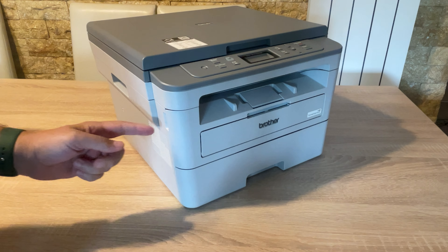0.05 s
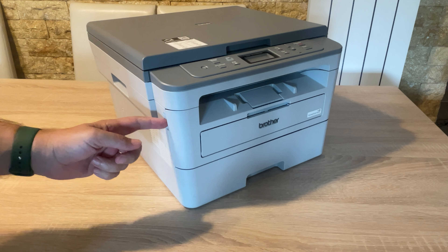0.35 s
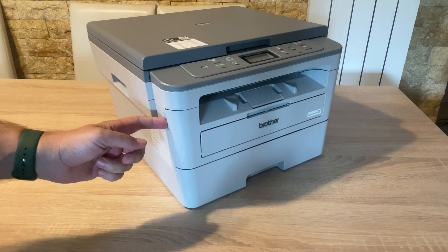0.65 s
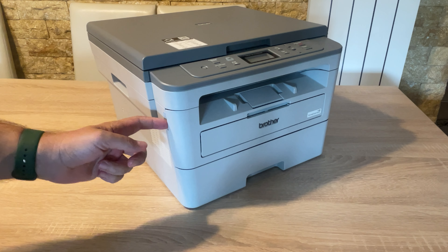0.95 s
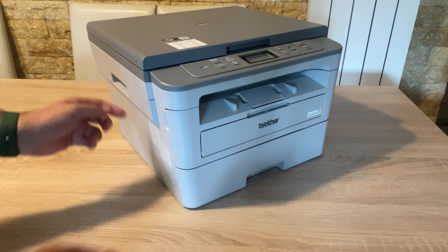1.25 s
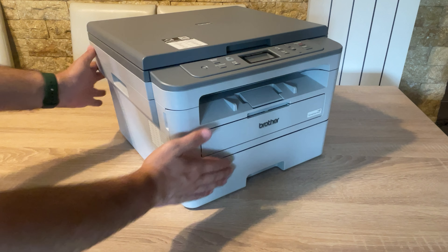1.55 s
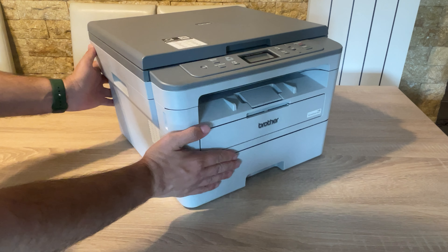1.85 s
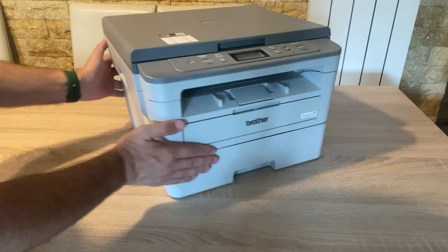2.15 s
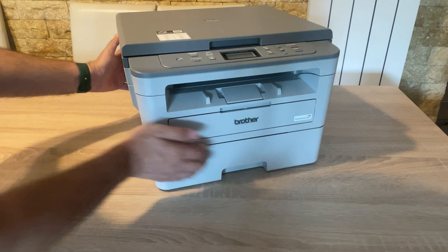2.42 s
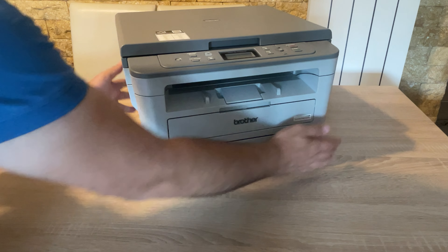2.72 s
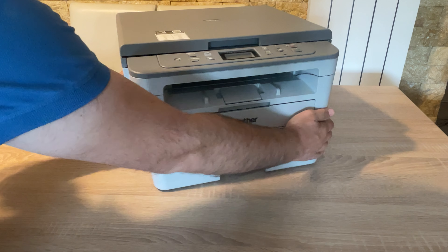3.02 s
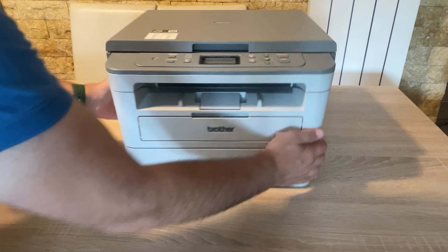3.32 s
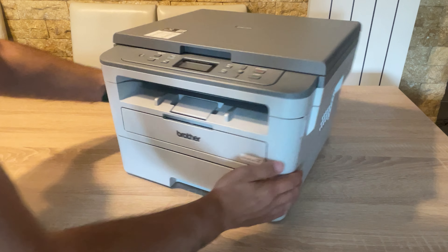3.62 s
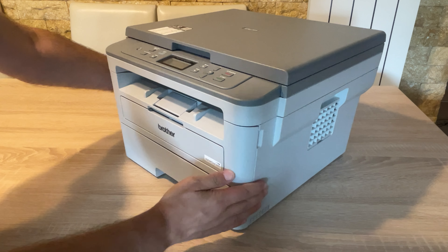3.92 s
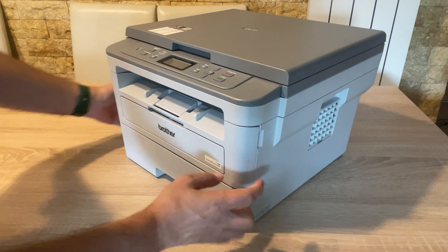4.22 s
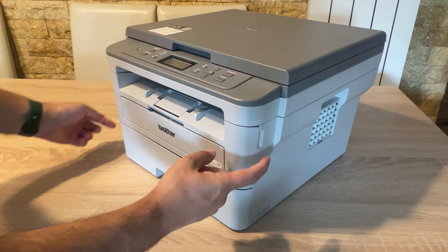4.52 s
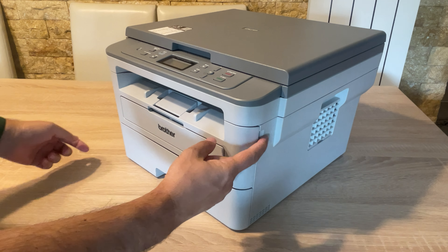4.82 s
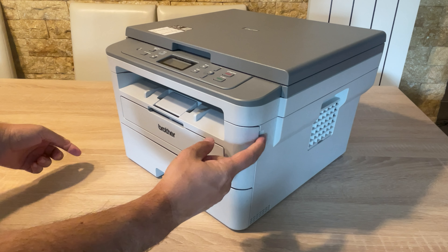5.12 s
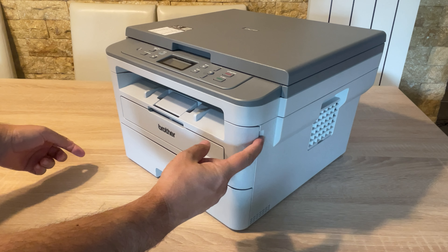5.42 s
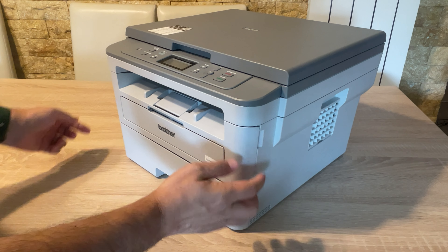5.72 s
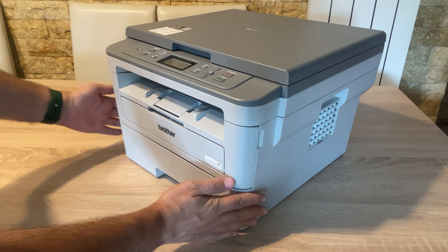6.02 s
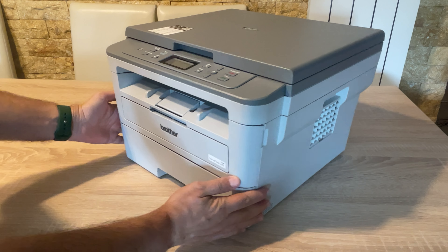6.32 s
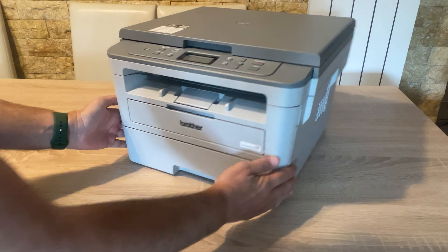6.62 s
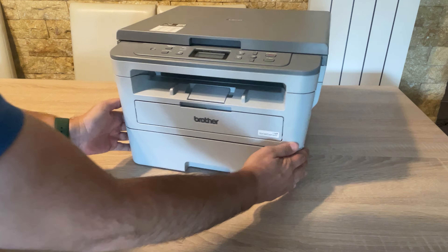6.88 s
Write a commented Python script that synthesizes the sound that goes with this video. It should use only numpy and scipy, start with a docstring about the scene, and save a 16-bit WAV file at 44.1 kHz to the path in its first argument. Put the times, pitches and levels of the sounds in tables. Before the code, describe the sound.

A plastic printer is tapped, then pushed and turned on a wooden table, scraping and shuddering between hollow knocks.

```python
"""Pushing a printer across a table

In a small, quiet room a plastic printer is tapped, then pushed and turned on a wooden table.
Its feet catch and slip on the grain, so they hiss, scrape and shake the tabletop. Hands rub
and knock on the hollow case, its loose panels clack and its seams snap. Two microphone
openings hear it from close by, with a short echo from the walls."""
import sys
import numpy as np
from scipy import signal
from scipy.fft import rfft, irfft, next_fast_len
from scipy.io import wavfile

SR = 44100
rng = np.random.default_rng(int(sys.argv[2]) if len(sys.argv) > 2 else 0)


def persist_wave(psi):
    """Save psi, clipped to +-1, as 16-bit WAV."""
    counts = np.round(np.clip(psi, -1, 1) * 32767).astype(np.int16)
    wavfile.write(sys.argv[1], SR, np.atleast_2d(counts).T)


N = 306495

# Tone curves of the plastic panels, the shaking tabletop and a scraped case: pitch_hz, level_db
PANEL_TONE = [(30, -58), (100, -13), (400, 5), (800, 5.5), (1600, 4), (2200, -3), (3500, -10.5),
              (7000, -13), (9000, -9.5), (9800, -13), (10600, -29), (12400, -37), (14000, -51)]
TABLETOP_TONE = [(25, -43), (55, -5.5), (85, -1), (108, -2.5), (128, 3.5), (145, 3.5), (165, -1.5),
                 (205, -1), (270, -3.5), (450, -49), (13000, -77)]
SCRAPE_TONE = [(30, -60), (120, -27.5), (210, 2.5), (290, 4), (360, 2), (480, -1), (620, -1.5), (830, -5),
               (1080, -3), (1300, -5), (1580, -4), (2100, -10), (2800, -16), (5000, -41), (13000, -77)]
# Tone curves of two walls of the shell under a soft fingertip: pitch_hz, level_db
SIDE_WALL = [(30, -35), (200, 5), (430, 9), (590, 15.5), (780, 16), (950, -2), (1420, 10), (1700, -4),
             (2600, -10), (2950, -5), (3300, -13), (4600, -10), (5600, -23), (9300, -22), (10500, -56)]
FRONT_PANEL = [(30, -35), (150, -12), (420, 5.5), (600, -4), (850, 4), (1150, -2.5), (1330, 3.5), (1750, 4),
               (2100, -7), (2450, -4), (2680, 1.5), (2950, -4.5), (4200, -5), (5200, -12.5), (7800, -18),
               (9300, -14.5), (10500, -65)]


def amp(db):
    """Turns decibels into a number to multiply by."""
    return 10 ** (np.asarray(db) / 20)


def unit(x):
    """Scales a signal to an average (rms) size of 1."""
    return x / np.sqrt(np.mean(x ** 2) + 1e-20)


def curve_at(curve, hz):
    """Looks up a curve at any pitch, gliding between its rows."""
    pitches, values = np.transpose(curve)
    return np.interp(np.log(hz + 1), np.log(pitches + 1), values)


def colour(x, curve):
    """Shapes a sound with a tone curve (pitch_hz, level_db), with no ringing ahead of the sound."""
    log_gain = np.log(amp(curve_at(curve, abs(np.fft.fftfreq(8192, 1 / SR)))))
    response = np.fft.ifft(np.exp(np.conj(signal.hilbert(log_gain)))).real[:4096]
    return signal.oaconvolve(x, response[None], axes=1)[:, :x.shape[1]]


def band_db(x, low_hz, high_hz):
    """Level between two pitches, with left and right averaged."""
    hz = np.fft.rfftfreq(x.shape[1], 1 / SR)
    power = abs(rfft(x.mean(0))[(hz >= low_hz) & (hz < high_hz)]) ** 2
    return 10 * np.log10(2 * power.sum() / x.shape[1] ** 2 + 1e-20)


def levelled(x, low_hz, high_hz):
    """Scales a sound so that its level between two pitches is 0 dB."""
    return x * amp(-band_db(x, low_hz, high_hz))


def wander(per_s):
    """A random curve that heads for a new value per_s times a second."""
    targets = rng.standard_normal(4000)
    return unit(np.interp(np.arange(N) / SR * per_s, np.arange(len(targets)), targets))


def add(mix, start_s, sound):
    """Adds a sound into the mix at the given time."""
    part = mix[:, max(round(start_s * SR), 0):][:, :sound.shape[1]]
    part += sound[:, :part.shape[1]]


def stereo(x):
    """Blends two signals into the partly alike pair that the microphone openings hear."""
    # How alike the two sides are: pitch_hz, likeness (0 to 1)
    likeness = [(130, 0.93), (270, 0.88), (580, 0.13), (1250, 0.52), (2700, 0.074), (6000, 0.2), (7600, 1),
                (12000, 0.62)]
    # How far the left wave runs ahead: pitch_hz, lead_radians
    left_lead = [(1000, 0), (2600, -1.3), (4800, 0), (6600, -.3), (7200, -2.5), (8000, -1.2), (8700, 0),
                 (9400, 1.3), (10200, 3), (10600, -2.8), (11400, 0)]
    # How much louder the left side is: pitch_hz, level_db
    balance = [(60, -0.2), (350, 2.5), (630, -1), (2000, 0.5), (3700, -2), (6500, -6), (8500, -1),
               (12000, 0.5)]
    size = next_fast_len(x.shape[1] + 512)
    hz = np.fft.rfftfreq(size, 1 / SR)
    left, other = rfft(x, size)
    same = np.clip(curve_at(likeness, hz), 0, .995)
    lean = amp(curve_at(balance, hz) / 2)
    right = (same * left + np.sqrt(1 - same ** 2) * other) * np.exp(-1j * curve_at(left_lead, hz))
    return irfft(np.array([left * lean, right / lean]), size)[:, :x.shape[1]]


def room(x, wet_db, gap_s=.008):
    """Adds echoes from the walls at level wet_db, each pitch dying away at its own speed."""
    # Time the echoes take to fall by 60 dB: pitch_hz, fade_s
    fade_times = [(150, 0.4), (400, 0.63), (1000, 0.36), (2800, 0.39), (8000, 0.25)]
    echoes = rng.standard_normal((2, SR // 2)) * (np.arange(SR // 2) > gap_s * SR)
    hz, t, bands = signal.stft(echoes, SR, nperseg=256)
    fade = amp(-60 * t / curve_at(fade_times, hz)[:, None])
    tail = signal.istft(bands * fade, SR, nperseg=256)[1]
    tail /= np.linalg.norm(tail[0])
    return x + amp(wet_db) * signal.fftconvolve(x, tail, axes=1)[:, :x.shape[1]]


def room_tone(level_db=-60.5):
    """The dull, steady background of the room, with two faint hums."""
    # Tone curve of the background: pitch_hz, level_db
    air_tone = [(18, -44), (35, -5.5), (55, -3), (130, 0), (185, -3), (370, -1.5), (480, -8), (1050, -10.5),
                (1560, -16), (2000, -24), (3000, -35.5), (8800, -38), (10200, -43.5), (12500, -48),
                (13500, -80)]
    # Narrow bands of noise that hum: pitch_hz, width_hz, level_db
    hums = [(376.2, 6.9, -71.5), (663.7, 8.9, -74)]
    out = amp(level_db) * unit(stereo(colour(rng.standard_normal((2, N)), air_tone)))
    for hz, width_hz, db in hums:
        hum = signal.lfilter(*signal.iirpeak(hz, hz / width_hz, SR), rng.standard_normal(N))
        out += amp(db) * unit(hum)
    return out


def rubs():
    """Skin catches and slides on the case: a light touch hisses, a firm palm scuffs through the shell."""
    # Tone curve of skin rubbing on plastic, with the microphone's dip near 10.4 kHz: pitch_hz, level_db
    rub_tone = [(500, -25), (2500, 4.5), (6000, -5), (7500, -3.5), (8700, 1.5), (9700, 1), (10400, -34),
                (12000, -12), (13200, -49)]
    # Light touches and dragging palms: start_s, length_s, level_db
    touches = [(1.6, 0.19, -65), (2.4, 0.42, -71), (2.7, 0.21, -66.5), (5.91, 0.1, -73),
               (6.01, 0.063, -69.5)]
    scuffs = [(1.74, 0.2, -55.5), (2.34, 0.18, -52), (2.93, 0.18, -46.5), (6.0, 0.26, -47.5)]
    out = np.zeros((2, N))
    for strokes, tone, grit_db in [(touches, rub_tone, 1.5), (scuffs, SCRAPE_TONE, 3.5)]:
        grit = amp(grit_db * wander(per_s=170))
        for start_s, length_s, db in strokes:
            count = round(length_s * SR)
            friction = rng.standard_normal((2, count)) * grit[round(start_s * SR):][:count]
            add(out, start_s, amp(db) * unit(stereo(colour(friction, tone))) * np.hanning(count))
    return out


def case_ring(scatter_db=0.):
    """The case rings at its own notes after a blow; the spot that is struck favours some of them."""
    # Notes of the case on the table: pitch_hz, level_db, fade_s (time to fall by 60 dB)
    notes = [(142, 11.5, 0.83), (195.8, 11.5, 0.2), (249.8, 19, 0.23), (288, 10, 0.19), (409.7, 8.5, 0.12),
             (504, 8.5, 0.092), (630, 2.5, 0.047), (798, 7.5, 0.054), (996, 3.5, 0.064), (1338, 7.5, 0.056),
             (1530, 6.5, 0.049), (1614, 5.5, 0.029), (1790, 4, 0.023), (1950, -0.5, 0.12), (2236, -4, 0.13),
             (2700, -2, 0.031), (3060, -3.5, 0.065), (3520, -7, 0.18)]
    t, ring = np.arange(SR // 2) / SR, 0
    for hz, db, fade_s in notes:
        height = amp(db + scatter_db * rng.uniform(-1.0, 1)) * 2 * np.log(1000) / (fade_s * SR)
        ring = ring + height * amp(-60 * t / fade_s) * np.cos(2 * np.pi * (hz * t + rng.random()))
    return ring * (1 - np.exp(-t / 0.0015))


def blow(build_s, tone, ring_db, scatter_db, wet_db):
    """One blow: loose panels chatter for a moment while the case rings on."""
    age = np.arange(SR // 2) / SR / build_s
    chatter = unit(rng.standard_normal((2, len(age))) * age * np.exp(-age)) / np.sqrt(len(age))
    ring = np.array([case_ring(scatter_db), case_ring(scatter_db)])
    return stereo(room(colour(chatter, tone) + amp(ring_db) * ring, wet_db))


def hardness(hit, thud_db, clack_db, crack_db):
    """Sets a blow's lows, middle and highs: flesh mostly thuds, plastic on plastic mostly cracks."""
    onset = hit[:, :round(.03 * SR)]
    low = thud_db - band_db(onset, 100, 500)
    middle = clack_db - band_db(onset, 500, 2500)
    high = crack_db - band_db(onset, 3000, 10000)
    return colour(hit, [(380, low), (620, middle), (2400, middle), (4000, high)])


def land(mix, hit_s, hit, brush_db, lead_s=0.013):
    """Adds a blow to the mix; skin or nail brushes the plastic ever harder just before it lands."""
    count = round(lead_s * SR)
    ramp = np.linspace(0, 1, count)
    brush = stereo(colour(rng.standard_normal((2, count)), PANEL_TONE)) * ramp * (1 - ramp ** 20)
    brush = unit(brush) * hit[:, :count].std() * amp(brush_db)
    add(mix, hit_s - count / SR, np.hstack([brush, hit]))


def taps(build_s=0.0047):
    """A soft fingertip taps a wall of the shell, never quite on the same spot."""
    # Finger taps: start_s, level_db, thud_db, crack_db (both added to level_db), wall
    finger_taps = [(0.307, -38.5, -21, -31, SIDE_WALL), (0.608, -46, -16, -28, FRONT_PANEL),
                   (0.667, -47, -7.5, -44, SIDE_WALL), (1.013, -57, -12, -36, FRONT_PANEL),
                   (1.059, -59, -15, -27.5, FRONT_PANEL), (5.116, -55.5, -1.5, -45, FRONT_PANEL),
                   (5.165, -33.5, -14, -31, FRONT_PANEL), (5.3454, -30.5, -14.5, -28.5, FRONT_PANEL),
                   (5.616, -30.5, -15.5, -32, FRONT_PANEL)]
    out = np.zeros((2, N))
    for start_s, db, thud_db, crack_db, wall in finger_taps:
        hit = blow(build_s, wall, ring_db=0, scatter_db=5, wet_db=-8.5)
        land(out, start_s, hardness(hit, db + thud_db, db - 14, db + crack_db), brush_db=-19.5)
    return out


def booms(waver=0.031):
    """A hand drags on the hollow case and makes one of its low notes swell for a moment."""
    # Swelling notes: start_s, length_s, pitch_hz, level_db
    swells = [(1.567, 0.057, 285, -51), (1.762, 0.059, 281.6, -52), (2.477, 0.092, 269, -55),
              (3.002, 0.063, 217, -49.5), (4.021, 0.069, 262.3, -40), (6.119, 0.14, 253.9, -41.5),
              (6.481, 0.079, 253.5, -47.5)]
    out = np.zeros((2, N))
    bend = 1 + waver * wander(per_s=120)
    for start_s, length_s, hz, db in swells:
        count = round(length_s * SR)
        pitch_hz = hz * bend[round(start_s * SR):][:count]
        tone = unit(np.sin(2 * np.pi * np.cumsum(pitch_hz) / SR))
        add(out, start_s, amp(db) * np.hanning(count) * tone[None])
    return out


def snaps(build_s=0.00094):
    """At a seam, plastic edges jump past each other with a very short, bright tick."""
    # Ticks: start_s, peak_db
    ticks = [(1.55, -41), (3.151, -30), (3.91, -38), (4.026, -38), (6.177, -37), (6.226, -33), (6.621, -28)]
    # Tone curve of the seam: pitch_hz, level_db
    seam_tone = [(2500, -51), (6000, -21), (7200, 6), (9700, 3), (10500, -1), (13000, -13), (15500, -37),
                 (16500, -42)]
    age, out = np.arange(SR // 5) / SR / build_s, np.zeros((2, N))
    for start_s, db in ticks:
        burst = rng.standard_normal((2, len(age))) * age * np.exp(-age)
        tick = stereo(room(colour(burst, seam_tone), wet_db=-12))
        add(out, start_s, amp(db) * tick / abs(tick).max())
    return out


def knocks(sharpness=3.9):
    """Loose panels clack and hands press on the case; each struck panel adds its own hollow note."""
    # Clacking panels and gripping hands: start_s, level_db, thud_db, crack_db (both shift
    # the level, for the lows and the highs), build_s, panel_hz, panel_boost_db
    clacks = [(1.549, -29.5, -20.5, -14, 0.0082, 795, 3.4), (1.771, -38, -30, -15.5, 0.0068, 1810, 7.3),
              (1.821, -42.5, -23, -11, 0.0079, 1300, 2.7), (2.2975, -28.5, -31, -14.5, 0.0023, 1620, 8.7),
              (2.349, -30, -28.5, -17.5, 0.0025, 498, 7.9), (2.486, -40, -22, -17.5, 0.0029, 2950, 12),
              (3.151, -40, -14, -7.5, 0.0033, 604, 10), (3.692, -38, -17, -20, 0.0045, 1080, 4.9),
              (3.909, -29, -34, -13, 0.0032, 1530, 4.4), (6.227, -27.5, -16.5, -9, 0.0029, 566, 4.8),
              (6.338, -30, -23, -16, 0.0047, 790, 4.1), (6.602, -36.5, -17, -21, 0.0074, 1400, 5.6),
              (6.621, -32, -22, -9, 0.0045, 680, 2.5)]
    grips = [(1.81, -43.5, -12.5, -11.5, 0.0023, 278, 3), (2.894, -51.5, -4.5, -12, 0.012, 300, 3),
             (2.964, -39.5, -12, -18.5, 0.0068, 524, 8.3), (2.992, -41, -24, -14, 0.0039, 500, 4),
             (3.007, -33.5, -15, -19, 0.0076, 1520, 3.2), (4.026, -35.5, -13.5, -10, 0.0023, 1600, 4),
             (4.075, -37.5, -6, -16, 0.0051, 523, 5.4), (6.051, -40, -16, -24, 0.017, 1010, 15),
             (6.095, -42, -10.5, -7, 0.0042, 1400, 5.9), (6.138, -36.5, -12.5, -8, 0.0027, 1330, 17),
             (6.177, -31.5, -9.5, -15.5, 0.0038, 360, 5.2)]
    out = np.zeros((2, N))
    for blows, brush_db in [(clacks, -11.5), (grips, -15)]:
        for start_s, db, thud_db, crack_db, build_s, panel_hz, boost_db in blows:
            hit = blow(build_s, PANEL_TONE, ring_db=2.5, scatter_db=-0.5, wet_db=-8)
            panel_note = signal.lfilter(*signal.iirpeak(panel_hz, sharpness, SR), hit)
            hit += (amp(boost_db) - 1) * panel_note
            land(out, start_s, hardness(hit, db + thud_db, db - 12.5, db + crack_db - 6), brush_db)
    return out


def thumps(push_s=0.00093, ring_s=0.045, ring_db=-1.5):
    """The printer rocks onto a foot: one soft push, and the tabletop shakes on briefly."""
    # Feet coming down: start_s, peak_db
    landings = [(3.015, -41.5), (3.811, -36.5), (3.921, -38), (4.305, -43), (6.177, -39.5), (6.199, -36.5)]
    t, out = np.arange(SR // 3) / SR, np.zeros((2, N))
    push = unit(t * np.exp(-t / push_s))
    thud = unit(colour(np.array([push, push]), TABLETOP_TONE))
    for start_s, db in landings:
        shake = unit(colour(rng.standard_normal((2, len(t))) * np.exp(-t / ring_s), TABLETOP_TONE))
        thump = stereo(thud + amp(ring_db) * shake)
        add(out, start_s, amp(db) * thump / abs(thump).max())
    return out


def shudder(pitch_hz=132, waver=0.042, flutter_db=0.3):
    """Pushed hard, the feet stick and slip in step with the tabletop's main note."""
    # Spells of shuddering: middle_s, half_width_s, level_db
    spells = [(3.035, 0.033, -48), (3.255, 0.035, -45), (3.47, 0.083, -38.5), (3.62, 0.05, -45.5),
              (6.73, 0.033, -43)]
    t = np.arange(N) / SR
    cycles = np.cumsum(pitch_hz * (1 + waver * wander(per_s=50))) / SR
    wave = unit(np.sin(2 * np.pi * cycles) + .15 * np.sin(4 * np.pi * cycles))
    swell = sum(amp(db) * np.exp(-((t - middle_s) / half_s) ** 2) for middle_s, half_s, db in spells)
    return wave * swell * amp(flutter_db * wander(per_s=25))


def slips(per_s, spread_db):
    """Tiny catches and releases of the feet on the wood grain, a few larger than the rest."""
    size = amp(spread_db * np.minimum(rng.exponential(1, N), 4))
    happens = rng.random(N) < per_s / SR
    return unit(size * happens * rng.standard_normal((2, N)))


def resonate(x, hz, width_hz):
    """Rings at a moving pitch: shift that pitch down to zero, smooth twice, shift back."""
    spin = np.exp(2j * np.pi * np.cumsum(hz) / SR)
    decay = np.exp(-np.pi * width_hz / SR)
    smoothed = signal.lfilter([(1 - decay) ** 2], [1, -2 * decay, decay * decay], x / spin)
    return 2 * (spin * smoothed).real


def singing(waver=0.037):
    """Fine slips make the scrape sing: a note swells, drifts and fades as the feet move on."""
    # Patches of grain that sing: middle_s, half_width_s, pitch_hz, width_hz, level_db
    patches = [(2.24, 0.16, 2510, 900, -58), (3.47, .13, 9040, 1400, -55.5), (3.69, 0.21, 5660, 1100, -55),
               (6.48, 0.15, 3300, 700, -56.5), (6.86, 0.097, 3100, 450, -57.5), (6.6, .2, 7900, 600, -66)]
    out = np.zeros((2, N))
    friction = slips(per_s=15000, spread_db=0.9)
    bend = 1 + waver * wander(per_s=18)
    for middle_s, half_s, hz, width_hz, db in patches:
        first, last = round((middle_s - 2 * half_s) * SR), round((middle_s + 2 * half_s) * SR)
        span = np.arange(max(first, 0), min(last, N))
        note = unit(resonate(friction[:, span], hz * bend[span], width_hz))
        swell = np.exp(-((span / SR - middle_s) / half_s) ** 4)
        add(out, span[0] / SR, amp(db) * note * swell)
    return stereo(colour(out, [(10000, 0), (13000, -30)]))


def turning(x, tone, wet_db, delay_s=.0019, swing=0.169, echo=0.42, cycle_deg=45):
    """Colours a sliding sound: its echo off the table drifts, and turning changes the wall echoes."""
    # How far the printer has turned: time_s, angle_deg
    angles = [(1.9, 0), (2.35, 20), (3.1, 26.5), (3.8, 87), (6.3, 83), (6.95, 32.5)]
    now = np.arange(N)
    earlier = now - delay_s * SR * (1 + swing * wander(per_s=4))
    near = x + echo * np.array([np.interp(earlier, now, channel) for channel in x])
    phase = 2 * np.pi * np.interp(now / SR, *np.transpose(angles)) / cycle_deg
    # two sets of wall echoes trade places
    walls = np.cos(phase) * (room(near, wet_db) - near) + np.sin(phase) * (room(near, wet_db) - near)
    return stereo(colour(near + walls, tone))


def push_gain(power, is_hiss=False, rise_curve=0.78):
    """Loudness follows speed to the given power; each push gets going, carries on and dies away."""
    # Pushes: start_s, rise_s, hold_s, swell_db_per_s, slowing_db_per_s, speed_db, hiss_db, one unused
    pushes = [(1.873, 0.094, 0.29, 20.5, 80, -7.5, -2.5, 0), (3.019, 0.2, 0.64, 3.5, 114, -3, -0.5, 1),
              (6.25, 0.33, 0.15, -16, 27.5, -4.5, 6, -1.5)]
    t, gain = np.arange(N) / SR, np.zeros(N)
    for start_s, rise_s, hold_s, swell, slowing, speed_db, hiss_db, _ in pushes:
        going_s = t - start_s - rise_s
        change_db = swell * np.clip(going_s, 0, hold_s) - slowing * np.maximum(going_s - hold_s, 0)
        speed = np.clip((t - start_s) / rise_s, 0, 1) ** rise_curve * amp(speed_db + change_db)
        gain += amp(hiss_db if is_hiss else 0) * speed ** power
    return gain


def bite():
    """Extra gain as the feet dig in, when the printer swings round or stops."""
    # Moments of digging in: middle_s, half_width_s, extra_db
    bites = [(2.26, 0.047, 4.5), (3.43, 0.23, 11), (3.96, 0.054, 10), (6.74, 0.24, 6.5)]
    t = np.arange(N) / SR
    return amp(sum(db * np.exp(-((t - middle_s) / half_s) ** 2) for middle_s, half_s, db in bites))


def sliding(judder_db=-56, scrape_db=-50, rasp_db=-52.5, hiss_db=-51):
    """Coarse slips of the feet shake the table, finer ones ring the case, the finest rasp and hiss."""
    # Tone curves of the rasp and the hiss as the microphone hears them: pitch_hz, level_db
    rasp_tone = [(300, -53), (1300, -2.5), (2300, 2.5), (3000, 1.5), (4300, -2), (5500, -8.5), (8000, -39),
                 (11000, -54)]
    hiss_tone = [(500, -59), (3200, -15), (4800, 2.5), (5800, 2), (6500, -1), (7300, 3), (8500, 2.5),
                 (9300, 2.5), (9900, -1.5), (10400, -14.5), (11800, -11.5), (13000, -47)]
    grip = amp(0.4 * wander(per_s=36))  # the feet catch and let go together
    judder = stereo(colour(slips(per_s=1300, spread_db=-2.5), TABLETOP_TONE))
    catches = slips(per_s=6000, spread_db=-0.6) * grip
    catches += amp(-9) * slips(per_s=70, spread_db=1.9)  # now and then a foot snags on grit
    ring = signal.oaconvolve(catches, case_ring()[None], axes=1)[:, :N]
    scrape = turning(catches + amp(-17) * ring, SCRAPE_TONE, wet_db=-3.5)
    rasp = turning(slips(per_s=20000, spread_db=1.0) * np.sqrt(grip), rasp_tone, wet_db=6)
    hiss = turning(slips(per_s=25000, spread_db=2.2) * np.sqrt(grip), hiss_tone, wet_db=-5.5)
    return (amp(judder_db) * push_gain(power=0.36) * bite() * levelled(judder, 70, 200)
            + amp(scrape_db) * push_gain(power=0.42) * bite() ** 0.3 * levelled(scrape, 250, 2000)
            + amp(rasp_db) * push_gain(power=1) * levelled(rasp, 2000, 4500)
            + amp(hiss_db) * push_gain(power=1.22, is_hiss=True) * levelled(hiss, 5000, 10000))


def scene():
    """The feet, the case and the hands, over the background of the room."""
    feet = sliding() + singing() + shudder() + thumps()
    case = knocks() + snaps() + booms()
    return feet + case + taps() + rubs() + room_tone()


def record(dry, low_hz=36, high_hz=16000):
    """The microphone loses the deepest bass, and the recorder cuts the highest treble."""
    thinned = signal.sosfilt(signal.butter(2, low_hz, "high", fs=SR, output="sos"), dry)
    treble_cut = signal.firwin(255, high_hz, window=("kaiser", 8), fs=SR)
    return signal.oaconvolve(thinned, treble_cut[None], "same")


dry = scene()
out = record(dry)
persist_wave(out)
```